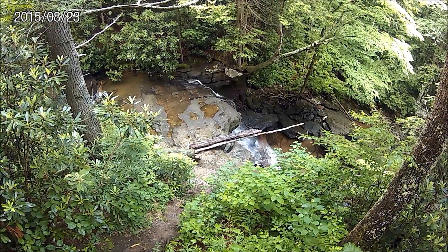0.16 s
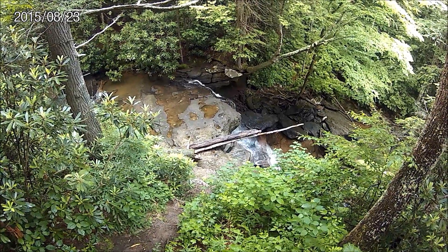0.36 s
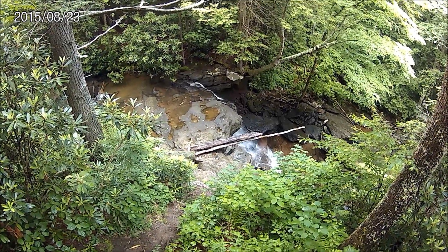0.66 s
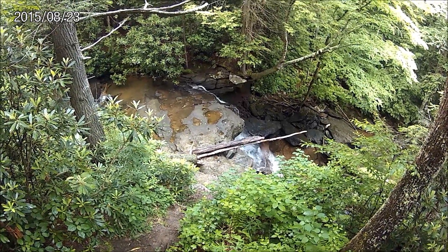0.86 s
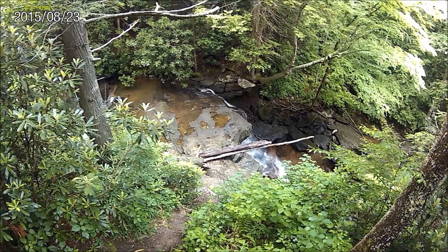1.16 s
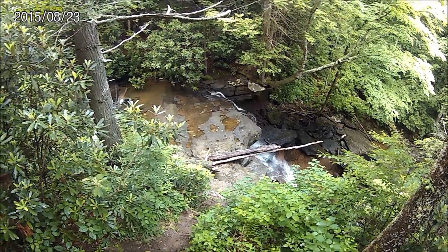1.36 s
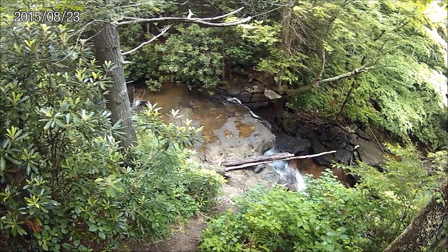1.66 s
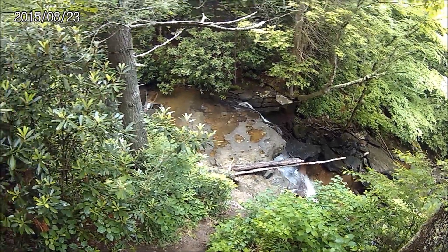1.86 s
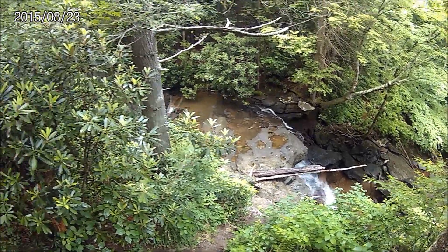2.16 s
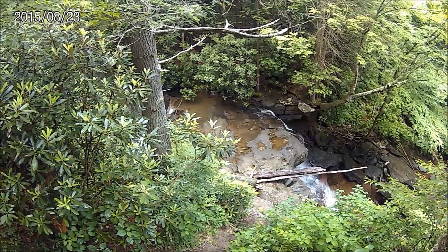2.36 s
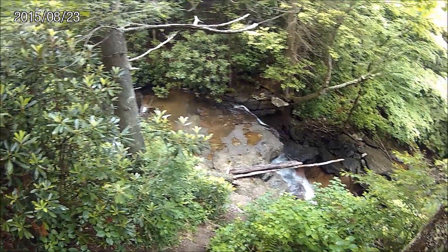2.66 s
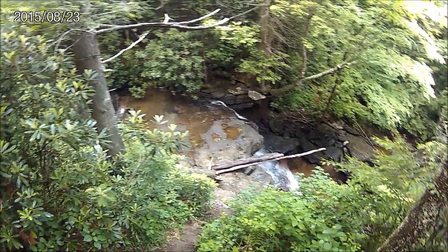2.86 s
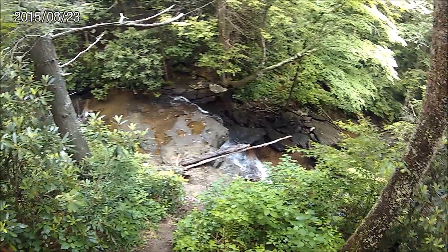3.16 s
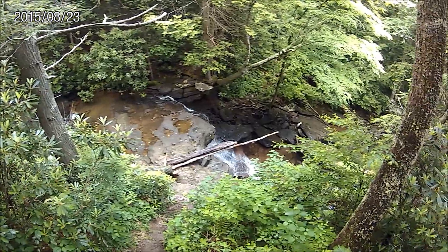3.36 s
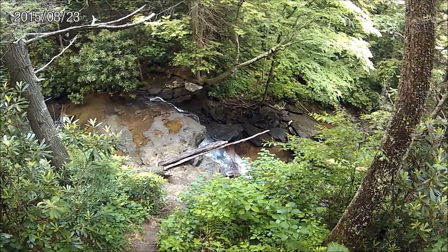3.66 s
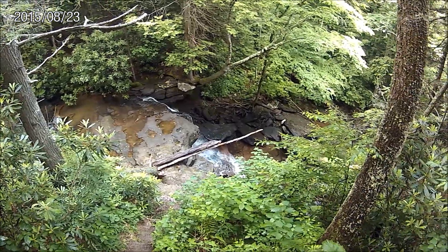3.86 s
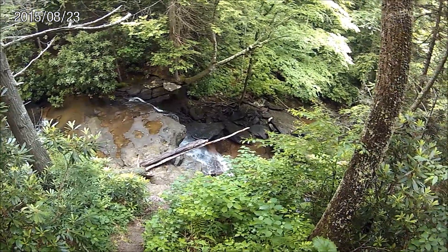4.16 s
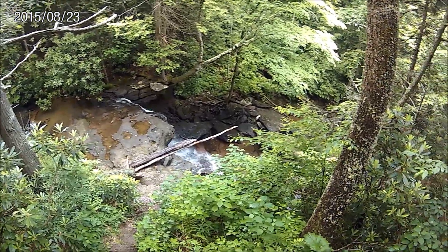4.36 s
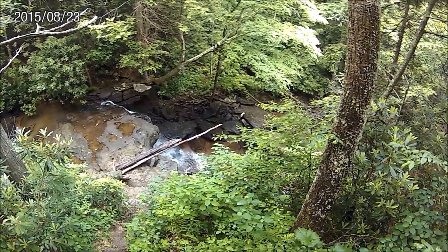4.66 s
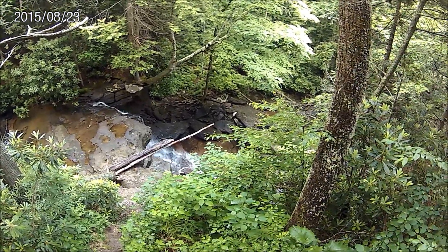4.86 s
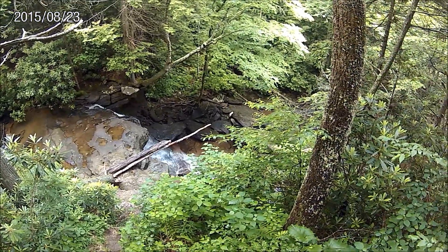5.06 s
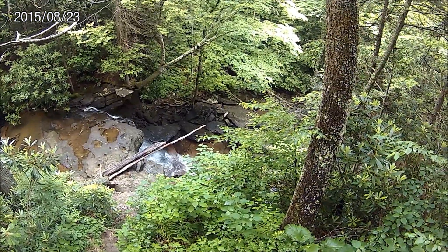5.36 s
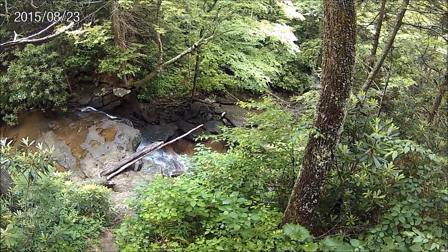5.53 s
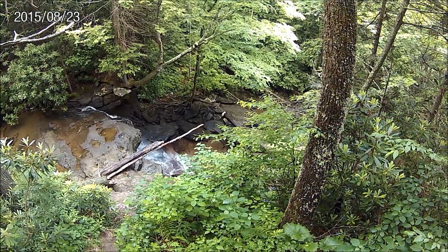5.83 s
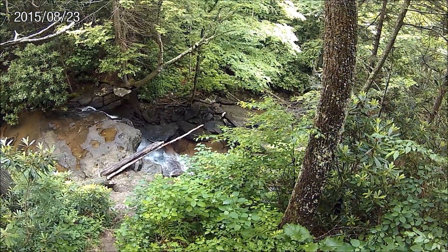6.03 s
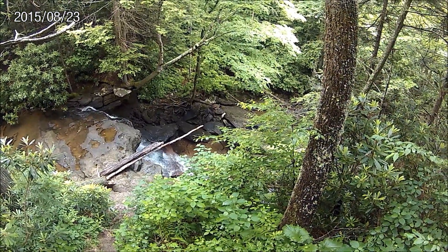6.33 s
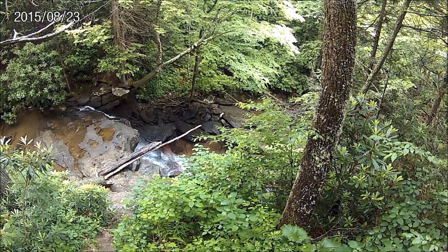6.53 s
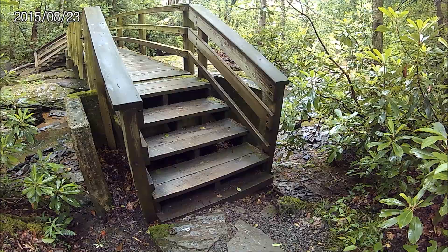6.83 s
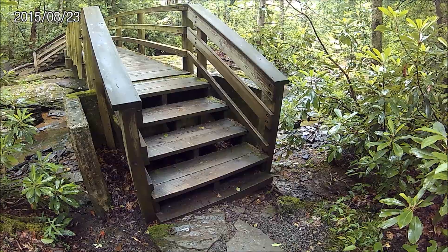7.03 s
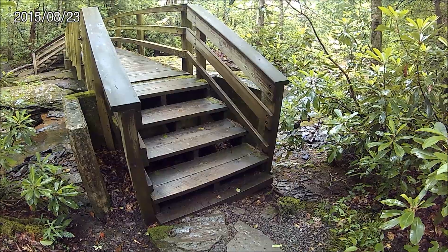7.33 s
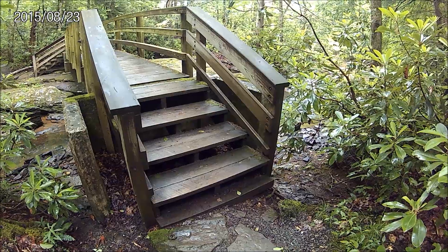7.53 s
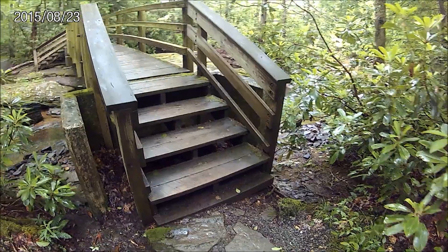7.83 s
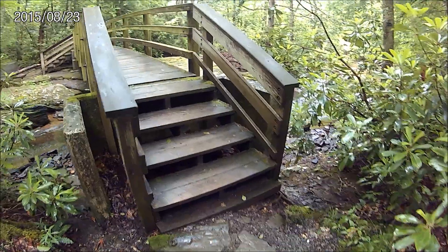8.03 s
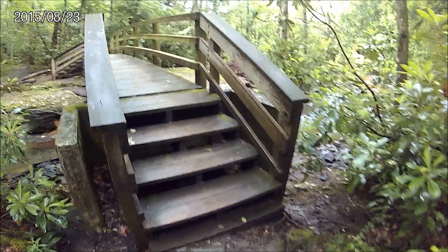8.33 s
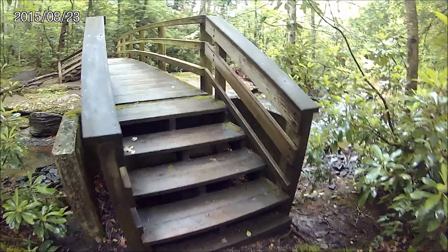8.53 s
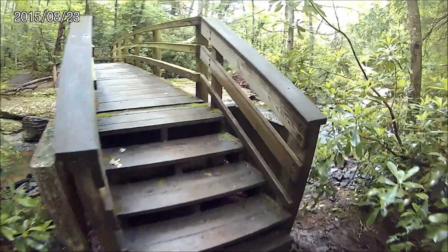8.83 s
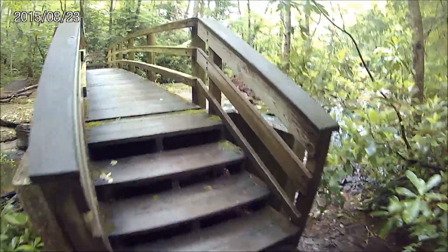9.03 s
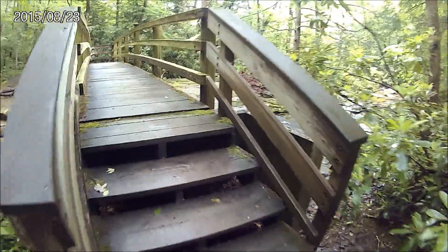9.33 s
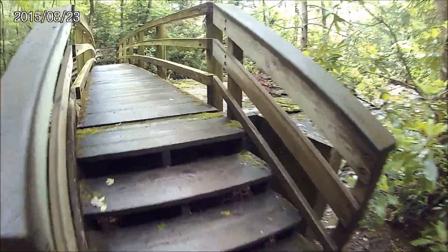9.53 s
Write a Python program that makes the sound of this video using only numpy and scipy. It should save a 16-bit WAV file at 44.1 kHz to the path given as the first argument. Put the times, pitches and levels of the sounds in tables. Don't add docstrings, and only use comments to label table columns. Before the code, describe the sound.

A small cascade rushes steadily in a wooded creek, heard from the bank through a closed, hollow-sounding camera housing. Its hiss dulls slightly as the microphone turns away, then brightens again. A small thump leads into a brief dead silence; another opens a softer, more distant stream. A very faint high bird whistles two notes, then a boot scuffs grit and knocks lightly on a wooden stair, with wet gravel settling.

```python
import sys
import numpy as np
from scipy import signal
from scipy.fft import rfft, irfft, next_fast_len
from scipy.io import wavfile
from scipy.ndimage import uniform_filter1d, map_coordinates

SR = 44100
rng = np.random.default_rng(int(sys.argv[2]) if len(sys.argv) > 2 else 0)


def volts(x):
    e = np.asarray(x, float) / 20
    return 10 ** e


def log_audio(samples):
    frames = np.atleast_2d(samples).T
    limited = np.clip(frames, -1, 1)
    pcm = np.round(limited * 32767).astype(np.int16)
    wavfile.write(sys.argv[1], SR, pcm)


N = 427329

# (time [s], turn [0-1])
HOUSING_TURN = [(0, 0.2), (1, .35), (1.8, .8), (2.35, 1), (2.8, .6), (3.3, 0.03), (4.3, .05), (6.77, 0.07)]
# (frequency [Hz], gain [dB])
TURNED_AWAY_COLOUR = [(1500, -0.63), (3000, 1), (4000, -1.5), (5000, -3.5), (7000, -2), (10000, -2.5),
                      (11800, -2.5), (14500, -3)]
# (middle [s], half length [s], frequency [Hz], drift [Hz/s], gain [dB])
TREBLE_GLINTS = [(.8, .9, 10500, 50, 1.5), (3.2, .4, 10600, 800, 1.5), (5.2, 1.8, 11900, 50, 1.5),
                 (3.75, .65, 14800, 700, 4.5), (5.5, 1.3, 13500, 300, 3.5)]
# (time [s], sharpness [ratio], below 0 = at a zero crossing)
SILENCE_EDGES = [
    (6.7733, 1),
    (6.9503, -2),
]
# (frequency [Hz], gain [dB])
DISTANCE_COLOUR = [(100, 2), (300, 4.5), (500, 0), (800, 3.5), (1200, -0.5), (2600, 0), (3500, -3),
                   (7000, -5), (10500, -5.5), (12000, -4.5), (13000, -1), (15500, 6)]
# (time [s], level [dB], length [ms], treble [dB])
GRIT_SCUFFS = [(8.136, -39, .1, -3), (8.1435, -35, .1, -2), (8.150, -39, 0.2, -3), (8.161, -50, 10, 11),
               (8.165, -48, 15, 15), (8.1735, -42, 2, 15), (8.176, -45, 10, -1), (8.187, -36, 1.7, 0),
               (8.268, -46, 1, -3), (8.888, -44, 12, -6)]
# (time [s], peak level [dB], frequency [Hz], rise [ms])
BOOT_KNOCKS = [(8.180, -44, 1520, 2.2), (8.1885, -41, 1520, 0.83), (8.216, -50, 1420, 2.3),
               (8.269, -43, 1530, .8), (8.274, -46, 1510, 1), (8.850, -47, 1400, 2), (8.860, -50, 1750, 3),
               (8.911, -52, 1600, 2), (8.996, -51, 1800, 1.8), (9.008, -47, 1920, 2.1),
               (9.5525, -32, 890, 2), (9.621, -48, 1500, .8), (9.625, -51, 1600, .8), (9.636, -50, 3870, 3)]
# (time [s], level [dB])
FOOTFALLS = [(8.18, -52), (8.85, -54), (9.6, -56.5)]
# (time [s], length [s], level [dB])
BIRD_NOTES = [
    (7.575, .235, -57),
    (7.85, .075, -59),
]
# (frequency [Hz], gain [dB])
HOUSING_BAND = [(30, -49), (80, -47.5), (130, -39.5), (310, -33.5), (420, -24), (700, -18), (1000, -10.5),
                (1350, -1), (1700, -1.5), (2400, -7.5), (3000, -6), (3350, -13.5), (3900, -14),
                (4300, -22.5)]
# (frequency [Hz], gain [dB])
WALL_LEAK = [(4700, -23.5), (5500, -33), (6300, -45), (7300, -42.5), (8800, -46.5), (10600, -38.5),
             (11300, -40), (12000, -41), (12800, -47.5), (15000, -53.5), (15700, -53)]
# (frequency [Hz], width [Hz])
HOUSING_NULLS = [(6000, 760), (8000, 2160)]


def unit(x):
    return x / np.sqrt(np.mean(x ** 2) + 1e-20)


def along(points, hz):
    f, v = np.transpose(points)
    return np.interp(np.log(hz + 1), np.log(f + 1), v)


def wobble(rate):
    knots = rng.standard_normal(int(N * rate / SR) + 4)
    return map_coordinates(knots, [np.arange(N) * rate / SR])


def filtered(x, gain):
    size = 2 * next_fast_len(N // 2 + 8192)
    cepstrum = irfft(np.log(gain(np.fft.rfftfreq(size, 1 / SR)) + 1e-6), size)
    cepstrum[1:size // 2] *= 2
    cepstrum[size // 2 + 1:] = 0
    response = np.exp(rfft(cepstrum))
    return irfft(rfft(x, size) * response, size)[..., :N]


def split(x, hz):
    low = signal.sosfiltfilt(signal.butter(4, hz, fs=SR, output="sos"), x)
    return low, x - low


def cascade():
    rush_db, glint_width_hz = -35, 450
    flow = water(patchy_db=0.21, bubble_db=-19.5, surge_db=0.02)
    hz, t, spectrum = signal.stft(flow, SR, nperseg=512)
    hz = hz[:, None]
    colour_db = along(TURNED_AWAY_COLOUR, hz) * np.interp(t, *np.transpose(HOUSING_TURN))
    for middle, half_s, glint_hz, drift, db in TREBLE_GLINTS:
        off = (hz - glint_hz - drift * (t - middle)) / glint_width_hz
        colour_db += db * np.exp(-off ** 2 - ((t - middle) / half_s) ** 4)
    coloured = signal.istft(spectrum * volts(colour_db), SR, nperseg=512)[1][:N]
    return volts(rush_db) * coloured


def water(patchy_db, bubble_db, surge_db):
    plops = bubbles(count=9000, centre_hz=1800, spread=0.602, cycles=6.9, scatter_db=2)
    flow = foam(patchy_db) + volts(bubble_db) * plops
    surge = wobble(7) + 0.26 * wobble(25)
    return unit(flow * volts(surge_db * surge))


def foam(patchy_db):
    spectrum = signal.stft(rng.standard_normal(N), nperseg=512)[2]
    patches = uniform_filter1d(rng.standard_normal(spectrum.shape), size=7, axis=0)
    patches = uniform_filter1d(patches, size=12, axis=1)
    patchy = spectrum * volts(patchy_db * unit(patches))
    return unit(signal.istft(patchy, nperseg=512)[1][:N])


def bubbles(count, centre_hz, spread, cycles, scatter_db):
    when, pitch, size = rng.random(count), rng.standard_normal(count), rng.exponential(size=count)
    hz = np.clip(centre_hz * np.exp(spread * pitch), 300, 9000)[:, None]
    t = np.arange(400) / SR
    age = t * hz / cycles
    ring = np.sin(2 * np.pi * hz * t * (1 + .12 * age)) * age * np.exp(-3 * age)
    ring *= volts(scatter_db * np.minimum(size, 3))[:, None] * np.sqrt(hz)
    where = (when * N).astype(int)[:, None] + np.arange(len(t))
    return unit(np.bincount(where.ravel(), ring.ravel())[:N])


def boot():
    return grit() + knocks() + settling()


def grit():
    body, edge = np.zeros((2, N + SR))
    crush = rng.standard_normal((len(GRIT_SCUFFS), SR // 20))
    for (s, db, ms, treble_db), noise in zip(GRIT_SCUFFS, crush):
        swell = np.sin(np.linspace(0, np.pi, int(ms * SR / 1000) + 8)) ** .5
        burst = volts(db) * unit(swell * noise[:len(swell)])
        start = round(s * SR)
        body[start:][:len(burst)] += burst
        edge[start:][:len(burst)] += burst * volts(treble_db)
    dull = split(body[:N], 2500)[0]
    crunch, fizz = split(split(edge[:N], 2000)[1], 8000)
    fizz, finest = split(fizz, 12800)
    return dull + volts(-6) * crunch + fizz + volts(4) * finest


def knocks():
    out, t = np.zeros(N + SR), np.arange(SR // 20) / SR
    for s, db, hz, rise_ms in BOOT_KNOCKS:
        u = t * 1000 / rise_ms
        swell = u ** 2 * np.exp(2 - 2 * u)
        out[round(s * SR):][:len(t)] += volts(db) * swell * np.sin(2 * np.pi * hz * t)
    return out[:N]


def settling():
    settle_s, upper_hz = .12, 2050
    t = np.arange(N) / SR
    fading = sum(volts(db) * (t > s) * np.exp(-np.abs(t - s) / settle_s) for s, db in FOOTFALLS)
    rustle = unit(split(rng.standard_normal(N), upper_hz)[0])
    return fading * volts(3.6 * wobble(60)) * rustle


def bird():
    pitch_hz, fade_s = 7015, .012
    start_share = .6
    t = np.arange(N) / SR
    notes = np.zeros(N)
    for s, length, db in BIRD_NOTES:
        growth = start_share + (1 - start_share) * (t - s) / length
        notes += volts(db) * ((t > s) & (t < s + length)) * growth
    singing = uniform_filter1d(notes, size=round(fade_s * SR))
    breath = volts(2 * wobble(40))
    phase = 2 * np.pi * np.cumsum(pitch_hz + 15 * wobble(60)) / SR
    return singing * breath * np.sin(phase)


def stream():
    stream_db = -43.5
    near = water(patchy_db=0.3, bubble_db=-17.5, surge_db=0.18)
    return volts(stream_db) * filtered(near, lambda hz: volts(along(DISTANCE_COLOUR, hz)))


def scene():
    change_s = (SILENCE_EDGES[0][0] + SILENCE_EDGES[1][0]) / 2
    first = np.arange(N) / SR < change_s
    return np.where(first, cascade(), boot() + bird() + stream())[None]


def housing(hz):
    gain = volts(along(HOUSING_BAND + WALL_LEAK, hz))
    for null_hz, width in HOUSING_NULLS:
        off = hz ** 2 - null_hz ** 2
        gain = gain * np.abs(off) / np.hypot(off, hz * width)
    return unit(gain)


def silence(sound):
    thump_ms = 0.62
    area = np.cumsum(sound[0])
    area = area - uniform_filter1d(area, size=400)
    swing = np.abs(unit(sound[0]))
    edges = []
    for s, sharp in SILENCE_EDGES:
        start = round(s * SR)
        fitness = np.abs(unit(area)) + sharp * swing
        edges.append(start + np.argmax(fitness[start:][:30]))
    index = np.arange(N)
    thumps = np.zeros(N)
    for edge, db, side in zip(edges, (-43.5, -50), (1, -1)):
        fade = np.exp(-np.abs(index - edge) / (thump_ms * SR / 1000))
        thumps += side * np.sign(area[edge]) * volts(db) * fade
    return (sound + thumps) * ((index < edges[0]) | (index >= edges[1]))


def top_cut(x):
    return signal.sosfilt(signal.butter(12, 15760, fs=SR, output="sos"), x)


def record(dry):
    hiss = volts(-103) * rng.standard_normal(dry.shape)
    mix = silence(filtered(dry, housing) + hiss)
    return top_cut(mix)


dry = scene()
out = record(dry)
log_audio(out)
```